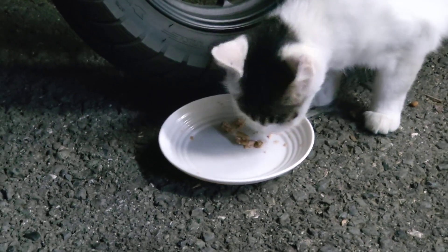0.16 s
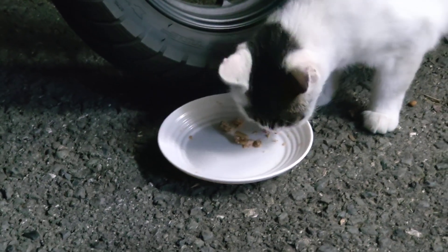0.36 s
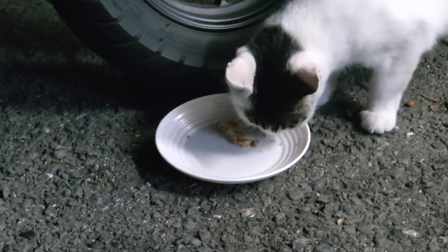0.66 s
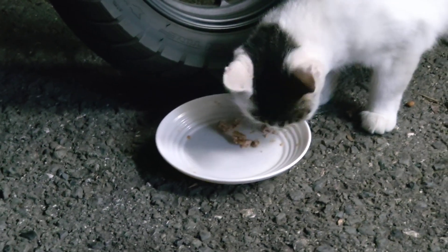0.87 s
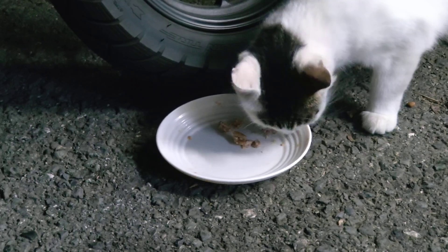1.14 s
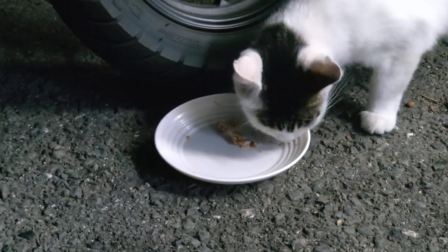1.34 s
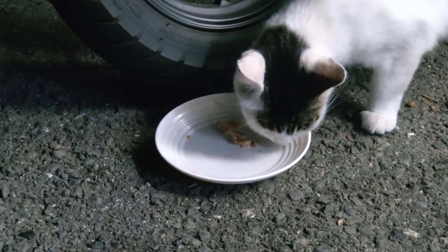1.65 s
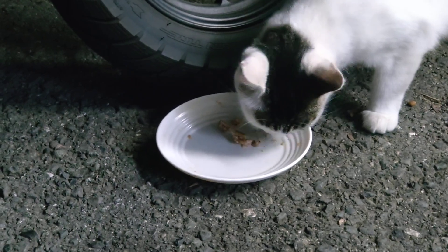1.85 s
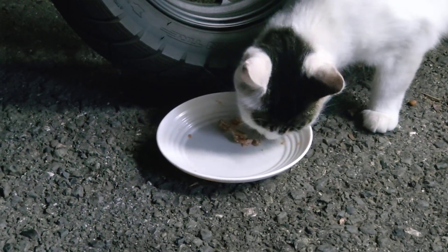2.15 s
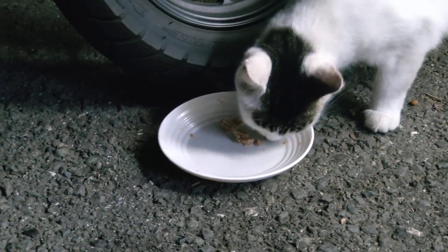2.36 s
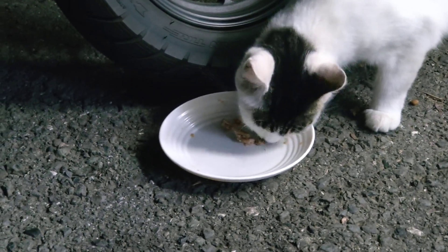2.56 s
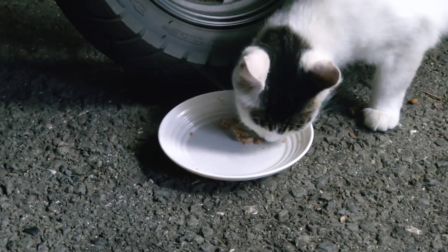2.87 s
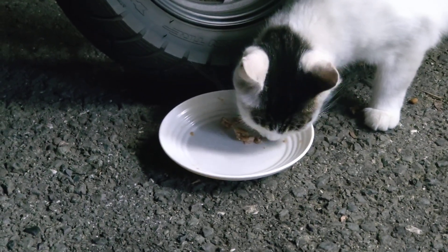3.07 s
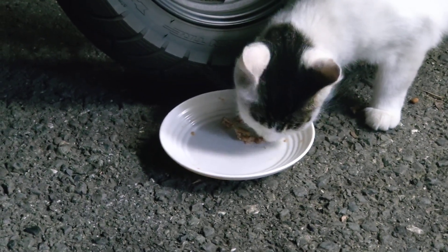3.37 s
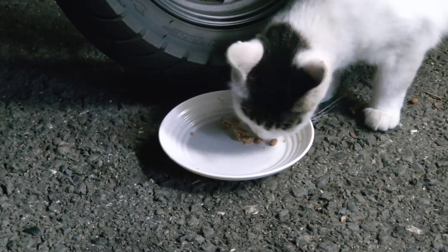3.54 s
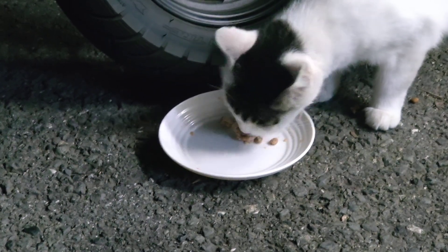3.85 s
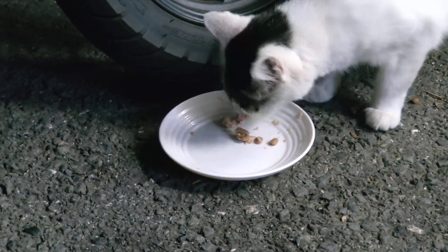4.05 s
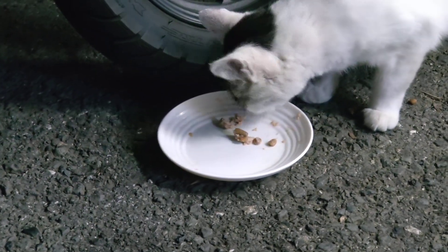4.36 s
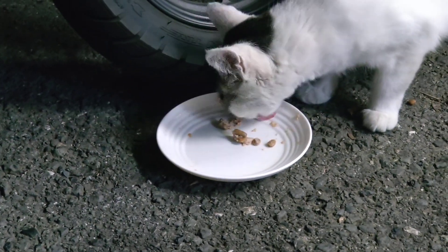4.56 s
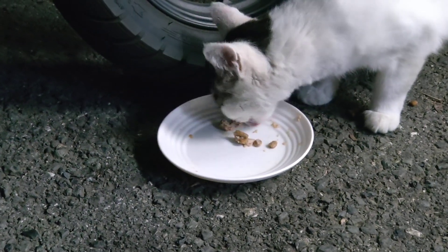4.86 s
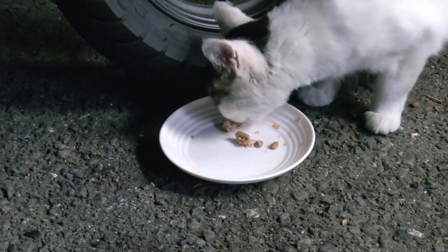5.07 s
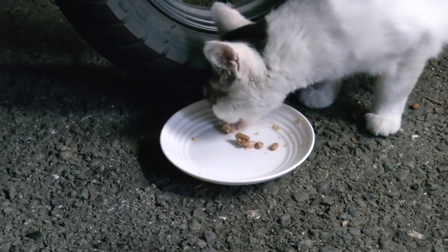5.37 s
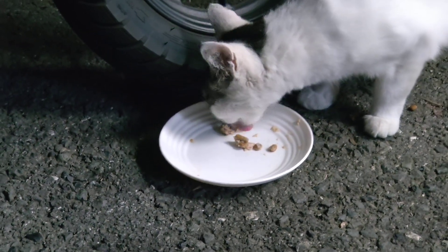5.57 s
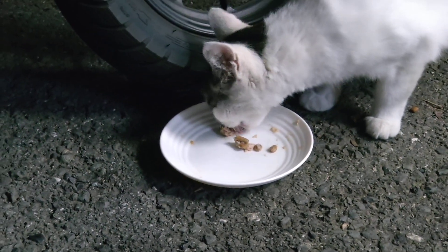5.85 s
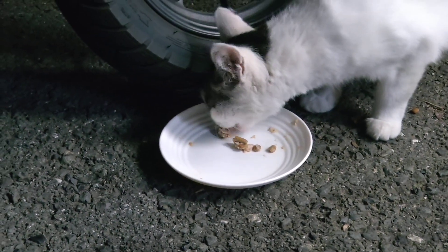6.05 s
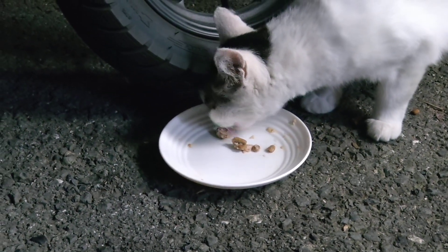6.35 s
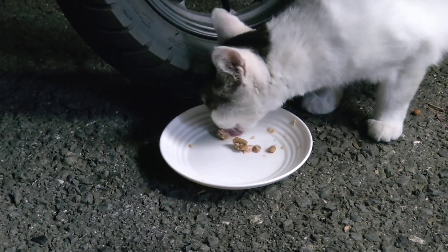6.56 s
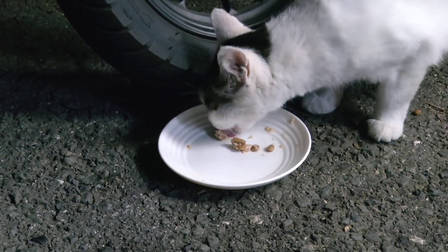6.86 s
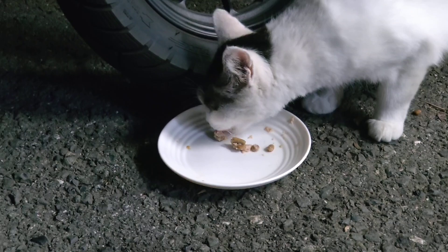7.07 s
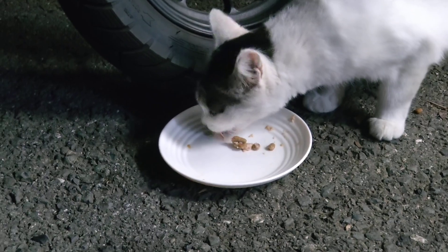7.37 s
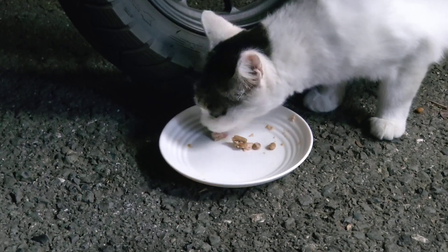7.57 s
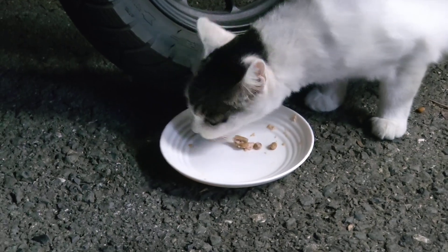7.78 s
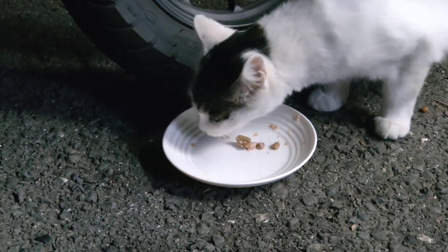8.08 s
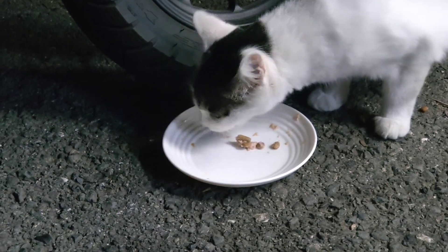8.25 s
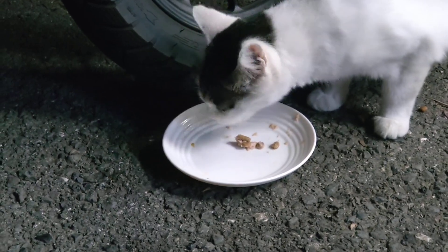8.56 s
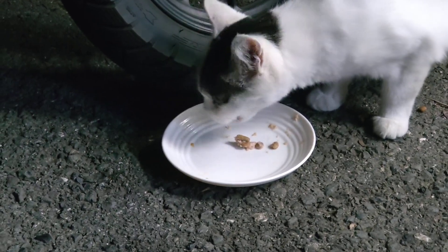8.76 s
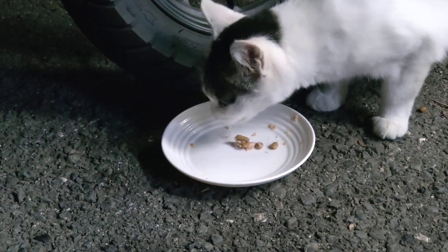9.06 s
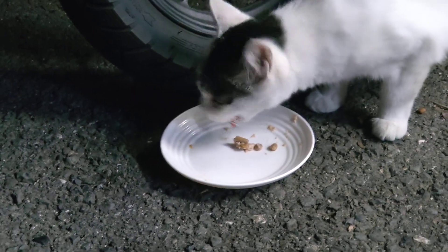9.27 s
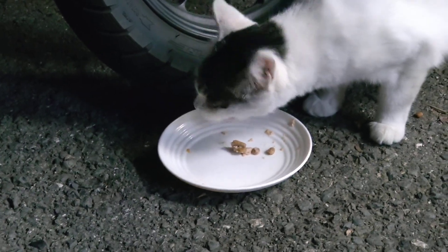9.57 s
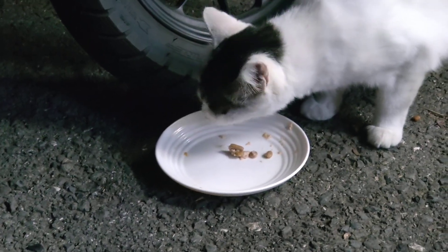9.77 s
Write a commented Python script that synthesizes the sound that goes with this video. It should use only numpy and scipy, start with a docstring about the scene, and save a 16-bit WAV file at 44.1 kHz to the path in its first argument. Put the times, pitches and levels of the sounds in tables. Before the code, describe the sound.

Crickets trill outdoors at night from start to finish. Their high, rapidly pulsing phrases overlap, most lasting under half a second and some a second or more. They sit somewhat to the right, with a short echo off walls. Underneath, a distant machine hums faintly and steadily, along with a soft, gently wavering hiss of far insects.

Close by and slightly right, a cat eats from a light plate, making small, wet, clicking smacks. One comes at about 1.5 seconds, then a cluster from 2.4 to 3.7 seconds, several more between 4.9 and 5.9, and a pair around 7.3. At about 8.5 and 8.9 seconds, two light taps make the plate ring very briefly, and a last couple of smacks follow by 9.3 seconds. The crickets and hum continue to the end, at about 10 seconds.

```python
"""Crickets and a cat at night

Four tree crickets trill by scraping their wings, and walls echo them. A far machine hums
as it turns, and far insects hiss. Close by, a cat eats from a light plate: its mouth
makes wet smacks, and now and then a tap rings the plate."""
import sys
import numpy as np
from scipy import signal
from scipy.fft import rfft, irfft, next_fast_len
from scipy.io import wavfile
from scipy.ndimage import uniform_filter1d, map_coordinates

SR = 44100
rng = np.random.default_rng(int(sys.argv[2]) if len(sys.argv) > 2 else 0)


def generate_wav(signal):
    """Clip the signal to [-1, 1] and save it as 16-bit WAV at the path in sys.argv[1]."""
    frames = np.transpose(np.atleast_2d(signal))
    scaled = np.clip(frames, -1, 1) * 32767
    pcm = np.round(scaled).astype(np.int16)
    wavfile.write(sys.argv[1], SR, pcm)


N = 437472
SIDES = np.array([[.5], [-.5]])  # shares a value out: plus half to the left, minus half to the right


def amp(db):
    """Turn decibels into a gain."""
    return 10 ** (np.asarray(db) / 20)


def normalized(x):
    """Scale a signal to an average (rms) level of 1."""
    return x / np.sqrt(np.mean(x ** 2) + 1e-20)


def curve_at(points, hz):
    """Read between (Hz, value) points on a log frequency scale."""
    freqs, values = np.transpose(points)
    return np.interp(np.log(hz + 1), np.log(freqs + 1), values)


def wobble(rate):
    """A smooth curve through `rate` random values a second."""
    return map_coordinates(rng.standard_normal(int(N * rate / SR) + 4), [np.arange(N) * rate / SR])


def filtered(x, response):
    """Scale and shift each frequency of x by response(hz)."""
    size = next_fast_len(N + SR // 2)
    return irfft(rfft(x, size) * response(np.fft.rfftfreq(size, 1 / SR)), size)[..., :N]


# How alike the noise is in both ears. Each row: frequency in Hz, likeness (1 same, 0 unrelated).
EAR_LIKENESS = [(60, 0.87), (300, 0.84), (640, 0.41), (1400, -0.0071), (6000, -0.023), (15000, -0.0049)]
# Which way the noise leans. Each row: frequency in Hz, left minus right in dB.
EAR_BALANCE = [(60, -3), (110, 0), (200, 1), (380, 1.5), (700, 0.0), (1290, 1.0), (2380, -3), (4400, -6.5),
               (8120, -2.5), (15000, -2)]
def stereo_noise(spectrum, patchy_db):
    """Shaped noise at level 1, with random louder and softer patches."""
    def colour(hz):
        angle = np.arccos(np.clip(curve_at(EAR_LIKENESS, hz), -1, 1)) / 2
        return amp(curve_at(spectrum, hz)) * [np.cos(angle), np.sin(angle)]
    bands = signal.stft(rng.standard_normal((2, N)), nperseg=512)[2]
    patches = uniform_filter1d(rng.standard_normal(bands.shape[1:]), 6, axis=0)
    patches = normalized(uniform_filter1d(patches, 10, axis=1))
    noise = signal.istft(bands * amp(patchy_db * patches), nperseg=512)[1][:, :N]
    mid, side = filtered(noise, colour)
    ears = np.array([mid + side, mid - side])
    return normalized(filtered(ears, lambda hz: amp(SIDES * curve_at(EAR_BALANCE, hz))))


# The tones in the hum. Each row: multiple of the turning rate, average level in dB.
HUM_TONES = [(5, -88), (6, -87), (8, -77.5), (10, -85.5), (12, -72), (13, -69), (14, -68.5), (15, -74),
             (16, -70)]
# The machine's noise. Each row: frequency in Hz, relative level in dB.
MACHINE_NOISE = [(15, -57), (25, -30), (98, -15), (264, -18.5), (376, -2), (453, -9), (510, -10), (613, -4),
                 (714, -6.5), (790, 2), (967, -7.5), (1110, -4.5), (1200, -17.5), (1400, -23.5),
                 (1820, -32), (3080, -120)]
def machine_hum(turn_hz=48.5):
    """A turning machine makes wavering tones, over noise that throbs once a turn."""
    angle = 2 * np.pi * np.cumsum(turn_hz * (1 + 0.00081 * wobble(1.505))) / SR
    tones = np.zeros((2, N))
    for multiple, db in HUM_TONES:
        ear_shift = -SIDES * multiple * turn_hz * 0.0013  # it reaches the right side first
        level = np.sqrt(2) * amp(db + 2.5 * wobble(6))
        drift = 0.41 * wobble(8) + rng.uniform(0, 2 * np.pi)
        tones += level * np.sin(multiple * angle + ear_shift + drift)
    throb = amp(-59 + 0.48 * wobble(1.14)) * (1 + 0.18 * np.sin(angle))
    return tones + throb * stereo_noise(MACHINE_NOISE, patchy_db=0.84)


# The colour of the hiss. Each row: frequency in Hz, relative level in dB.
HISS_COLOUR = [(900, -27), (1300, -4), (2400, -7), (3100, -10), (4000, -3.5), (4600, 0), (6000, 2),
               (7000, -4.5), (7700, -13.5), (9100, -2), (10200, -5), (11400, -16.5), (14500, -14.5),
               (15600, -16)]
def insect_hiss():
    """Far insects and microphone noise blend into a gently wavering hiss."""
    return amp(-54.5 + 1.4 * wobble(2.486)) * stereo_noise(HISS_COLOUR, patchy_db=1.5)


def wing_strokes(phrases, gap_s, slow_start_s):
    """Each stroke's time, number in its phrase and level; the first few gaps are longer."""
    rows = []
    for first, last, db in phrases:
        gaps = max(round((last - first - slow_start_s) / gap_s), 1)
        number = np.arange(gaps + 1)
        offset = number * gap_s + slow_start_s * (1 - np.exp(-number / 2.2))
        times = first + offset * (last - first) / offset[-1]  # stretched to fill the phrase
        rows.append([times, number, np.full(len(number), db)])
    return np.hstack(rows)


def cricket(phrases, hz, gap_s, slow_start_s, climb_hz, sag_hz, overtone_db, stroke_s=.018):
    """One wing scrapes the other's ridges and makes it ring; the pitch sags as the wings close."""
    times, number, db = wing_strokes(phrases, gap_s, slow_start_s)
    pitch_luck, phase_luck, level_luck = rng.standard_normal((len(times), 3)).T[:, :, None]
    progress = np.arange(round(stroke_s * SR)) / (stroke_s * SR)  # 0 to 1 through a stroke
    early = np.exp(-number / 2.5)[:, None]  # a phrase starts low and climbs
    pitch = hz + 12 * pitch_luck - climb_hz * early - sag_hz * progress ** 3.5
    phase = 2 * np.pi * np.cumsum(pitch, axis=1) / SR + 10 * phase_luck
    fade_in = np.clip(progress / 0.151, 0, 1) ** 1.8
    fade_out = np.clip((1 - progress) / 0.31, 0, 1) ** 0.91
    overtone = amp(overtone_db - 8 * early - 21 * progress ** 3) * np.sin(2 * phase)
    strokes = amp(db[:, None] + 1.02 * level_luck) * fade_in * fade_out * (np.sin(phase) + overtone)
    starts = np.round((times - .6 * stroke_s) * SR).astype(int) + SR  # a spare second at each end
    samples = starts[:, None] + np.arange(len(progress))
    return np.bincount(samples.ravel(), strokes.ravel(), N + 2 * SR)[SR:SR + N]


# Echoes off walls and ground. Each row: base delay in seconds, left level in dB, right level in dB.
WALL_ECHOES = [(.0031, -14, -16), (.0085, -8.5, -8.5), (.0152, -9, -2.5), (.021, -14.5, -18.5),
               (.033, -3.5, -3.5)]
def among_walls(song, pan_db, left_lead_s, delay_scale, tail_db):
    """A song arrives directly, as echoes and as a scattered tail; pan_db is left minus right."""
    def paths(hz):
        direct = amp(pan_db * SIDES) * np.exp(2j * np.pi * hz * left_lead_s * SIDES)
        stretch = delay_scale + 0.04005 * SIDES  # delays depend on where the cricket sits
        return direct + sum(amp([[left], [right]]) * np.exp(-2j * np.pi * hz * delay * stretch)
                            for delay, left, right in WALL_ECHOES)
    t = np.arange(SR // 3) / SR
    scatter = rng.standard_normal((2, len(t))) * amp(-60 * t / .2) * (1 - np.exp(-t / 0.0041))
    tail = signal.fftconvolve(song[None], scatter / np.linalg.norm(scatter[0]), axes=1)[:, :N]
    return filtered(song, paths) + amp(tail_db) * tail


# Each cricket's phrases. Each row: first and last wing stroke in seconds, relative level in dB.
NEAR_PHRASES = [(.079, .534, -34), (.672, 1.067, -33.5), (1.201, 1.535, -32.5), (1.646, 2.011, -33),
                (2.128, 2.49, -32.5), (2.617, 3.069, -33.5), (3.193, 3.677, -33), (3.801, 4.196, -34),
                (4.336, 4.79, -33.5), (4.913, 5.278, -33.5), (5.395, 5.76, -34.5), (5.882, 6.215, -35),
                (6.331, 6.606, -34.5), (6.729, 7.152, -35.5), (7.282, 7.674, -33.5), (7.804, 8.11, -34.5),
                (8.235, 8.738, -35), (8.863, 9.201, -34.5), (9.317, 9.653, -35), (9.784, 9.91, -34)]
HIGH_PHRASES = [(.006, .409, -36.5), (.6, .927, -40.5), (1.1, 1.429, -37.5), (1.605, 1.93, -40.5),
                (2.12, 2.503, -38.5), (2.715, 3.009, -40), (3.195, 3.609, -37.5), (4.2, 4.496, -39.5),
                (4.67, 5.121, -37), (5.34, 5.672, -35), (5.81, 6.195, -38.5), (6.4, 6.723, -40),
                (6.87, 7.268, -38), (7.47, 7.818, -38.5), (8.06, 8.438, -36), (8.63, 9.04, -37.5),
                (9.14, 9.523, -45), (9.74, 9.896, -36.5)]
LONG_PHRASES = [(.016, .533, -39.5), (.668, 1.64, -38.5), (1.683, 2.682, -38), (2.768, 3.615, -39),
                (4.259, 5.846, -39), (5.927, 6.442, -37.5), (6.55, 7.453, -38.5), (7.548, 8.454, -38.5),
                (8.718, 9.894, -37.5)]
FAINT_PHRASES = [(.578, .64, -46.5), (3.669, 3.817, -44), (3.96, 4.139, -45), (8.502, 8.651, -51)]
def crickets():
    """Four crickets sing, each with its own pitch, wing speed and place."""
    near = cricket(NEAR_PHRASES, hz=5278, gap_s=.0298, slow_start_s=.009,
                   climb_hz=187, sag_hz=433, overtone_db=-20)
    high = cricket(HIGH_PHRASES, hz=5602, gap_s=.0288, slow_start_s=.008,
                   climb_hz=198, sag_hz=460, overtone_db=-37)
    long = cricket(LONG_PHRASES, hz=5500, gap_s=.0302, slow_start_s=.002,
                   climb_hz=60.3, sag_hz=436, overtone_db=-32)
    faint = cricket(FAINT_PHRASES, hz=5400, gap_s=.0297, slow_start_s=.001,
                    climb_hz=30, sag_hz=380, overtone_db=-40)
    return (among_walls(near, pan_db=-8.5, left_lead_s=4.5e-5, delay_scale=1.0, tail_db=-2)
            + among_walls(high, pan_db=-4, left_lead_s=2.5e-5, delay_scale=.8, tail_db=2)
            + among_walls(long, pan_db=-13.5, left_lead_s=3e-5, delay_scale=1.2, tail_db=4.5)
            + among_walls(faint, pan_db=-10, left_lead_s=3e-5, delay_scale=0.77, tail_db=1))


# Smacks of the cat's mouth. Each row: start in seconds, relative levels of the click and of
# the plate's ring in dB, left minus right in dB.
MOUTH_SMACKS = [(1.508, -42, -56, -4), (2.365, -38, -65, -5.5), (2.402, -48, -63, -4.5),
                (2.4828, -41, -67, -6.5), (2.584, -49, -67, -6.0), (2.6797, -39, -65, -4),
                (2.7926, -43, -53, -9), (3.2281, -44, -61, -5), (3.5628, -40, -52, -9),
                (3.7194, -42, -61, -9), (4.9207, -43, -71, -8), (5.058, -44, -63, -5.0),
                (5.2816, -37, -60, -4), (5.6084, -35.5, -62, -1), (5.9364, -37.5, -68, -8),
                (7.2278, -39, -52, -7), (7.3108, -43, -63, -6.0), (8.5033, -44, -37.5, -10),
                (8.764, -45, -70, -6.5), (8.883, -35, -38.5, -9.5), (9.1546, -46, -69, -6.5),
                (9.3107, -44, -61, -3.0)]
# The wet colour of a smack. Each row: frequency in Hz, gain in dB.
SMACK_COLOUR = [(1500, -38), (3500, -5.5), (5000, 5), (8500, -1.5), (11000, -7), (15500, -19)]
# The plate's tones. Each row: pitch in Hz, relative level in dB, seconds to fade by 60 dB.
PLATE_TONES = [(1960, -14.5, 0.017), (2340, -1, 0.024), (2557, -5.5, 0.046), (3970, -16.5, .015)]
def cat_eating():
    """Each smack is a wet click that rings the plate; the ground and a wall echo both."""
    clicks, rings = np.zeros((2, 2, N + SR))
    t = np.arange(SR // 10) / SR
    for start_s, click_db, ring_db, pan_db in MOUTH_SMACKS:
        pan, i = amp(pan_db * SIDES), round(start_s * SR)
        click = amp(click_db + 7 - 60 * t / 0.0068) * rng.standard_normal((2, len(t)))
        ring = sum(amp(db + rng.normal(0, 1.5) - 60 * t / fade_s) * np.sin(2 * np.pi * hz * t)
                   for hz, db, fade_s in PLATE_TONES)
        clicks[:, i:i + len(t)] += pan * click
        rings[:, i:i + len(t)] += pan * amp(ring_db + 1) * ring
    direct = filtered(clicks[:, :N], lambda hz: amp(curve_at(SMACK_COLOUR, hz))) + rings[:, :N]
    return filtered(direct, lambda hz: 1 + amp(-10) * np.exp(-2j * np.pi * hz * .0075)
                    + amp(-12) * np.exp(-2j * np.pi * hz * 0.018))


def scene():
    """Add all the sounds together."""
    return machine_hum() + insect_hiss() + crickets() + cat_eating()


def record(dry):
    """Cut away everything above 15800 Hz."""
    return filtered(dry, lambda hz: hz < 15800)


dry = scene()
out = record(dry)
generate_wav(out)
```